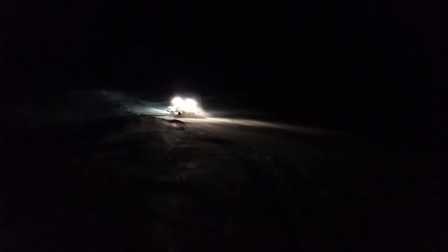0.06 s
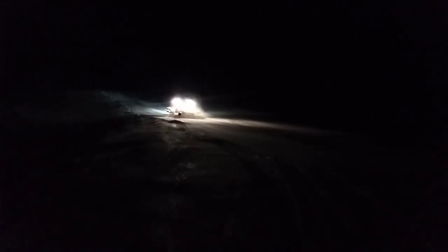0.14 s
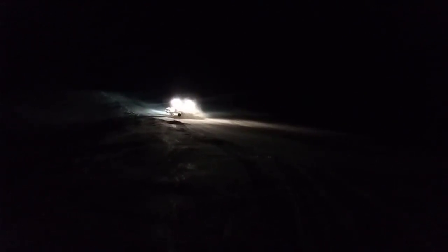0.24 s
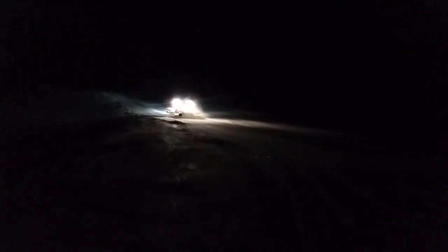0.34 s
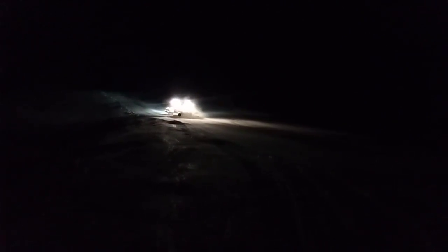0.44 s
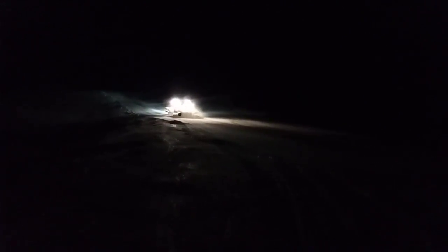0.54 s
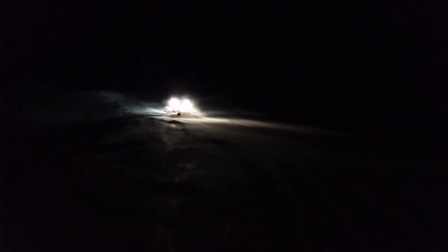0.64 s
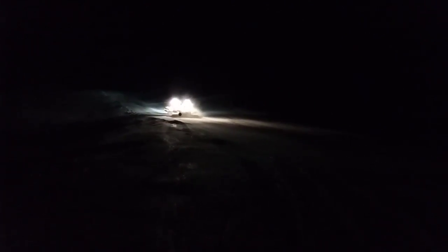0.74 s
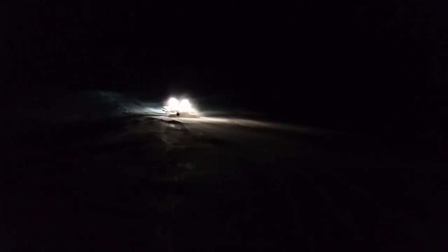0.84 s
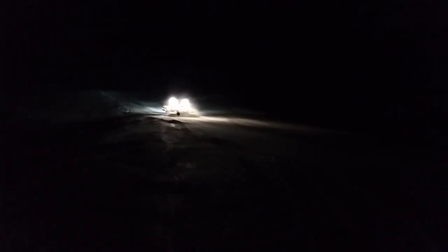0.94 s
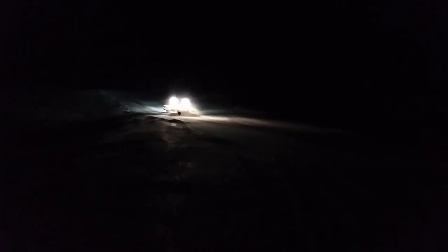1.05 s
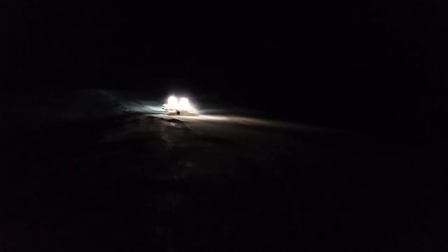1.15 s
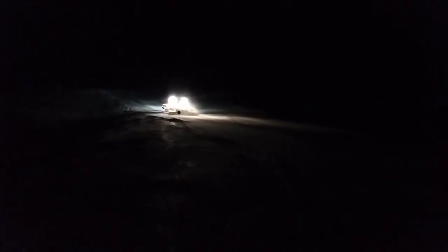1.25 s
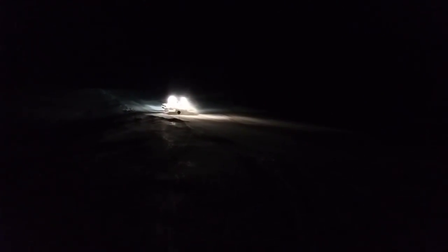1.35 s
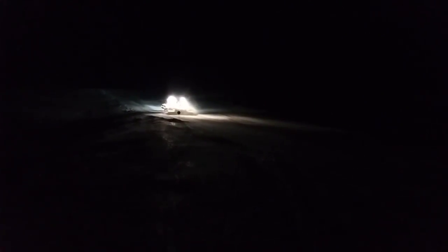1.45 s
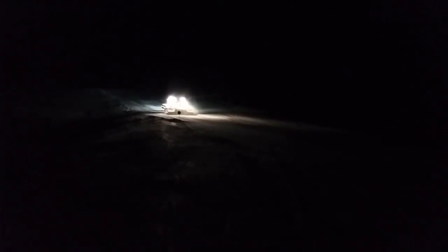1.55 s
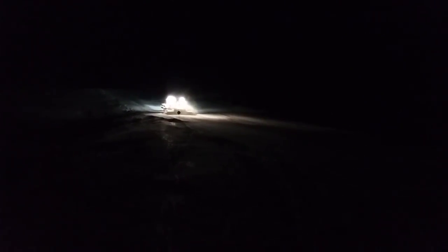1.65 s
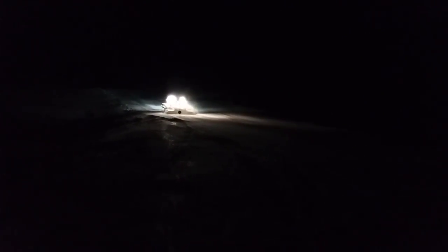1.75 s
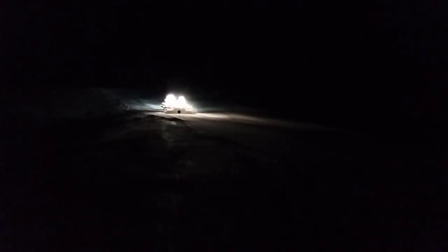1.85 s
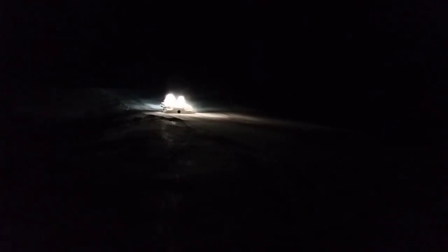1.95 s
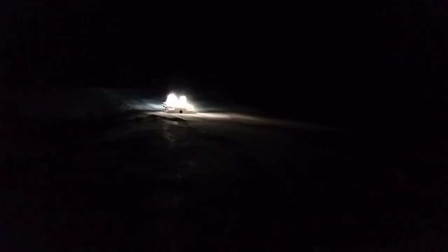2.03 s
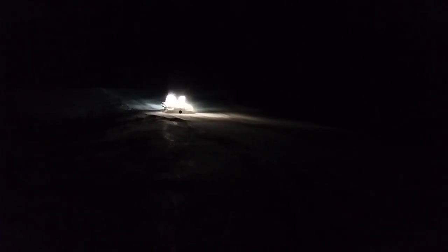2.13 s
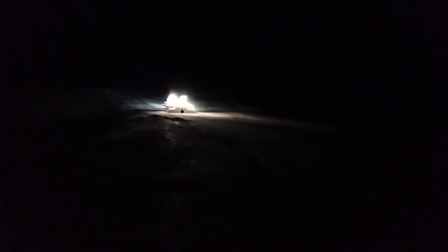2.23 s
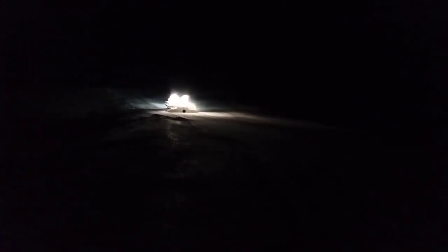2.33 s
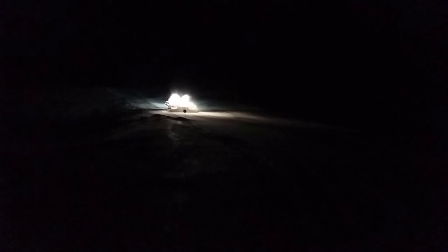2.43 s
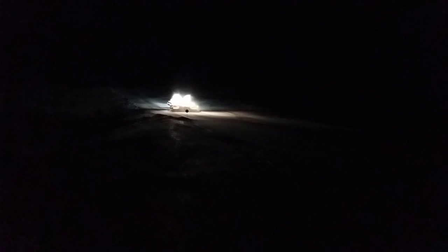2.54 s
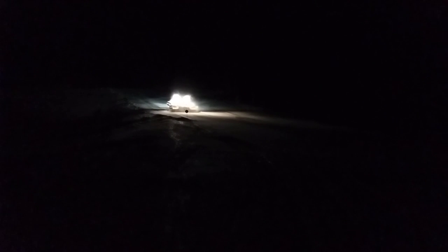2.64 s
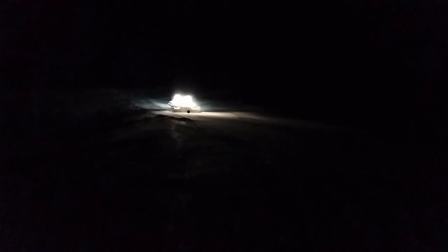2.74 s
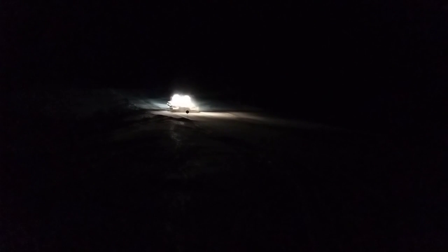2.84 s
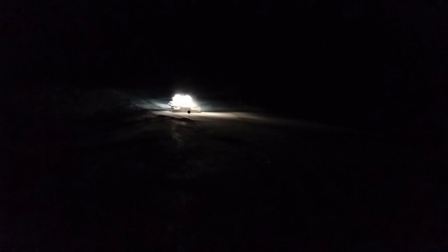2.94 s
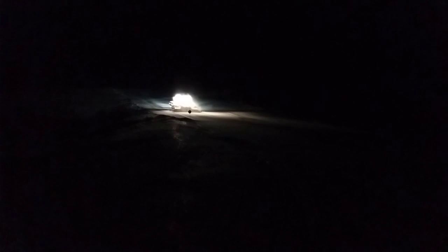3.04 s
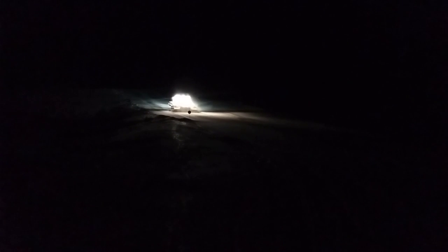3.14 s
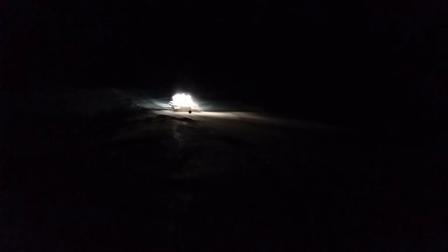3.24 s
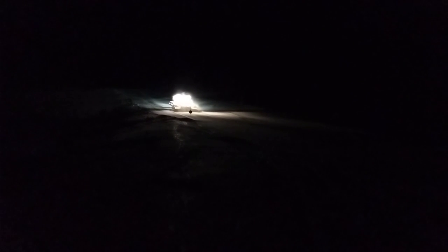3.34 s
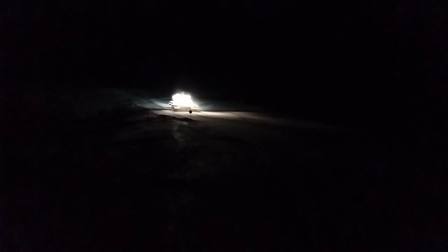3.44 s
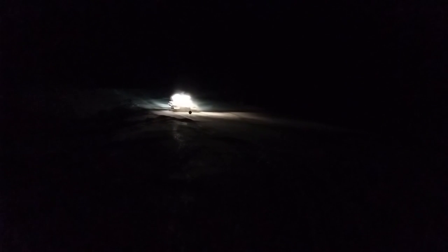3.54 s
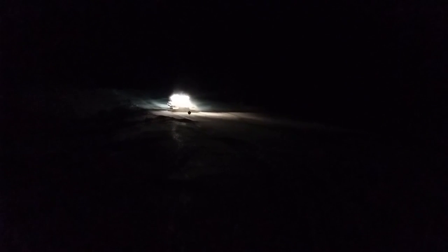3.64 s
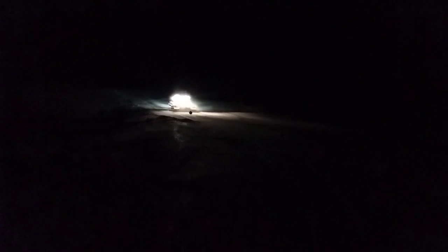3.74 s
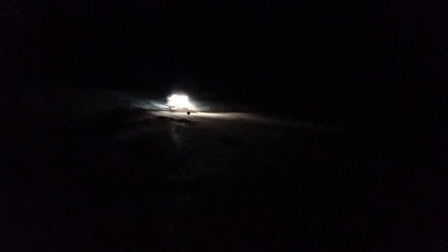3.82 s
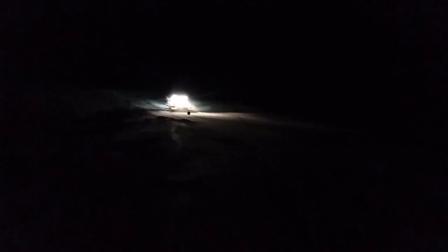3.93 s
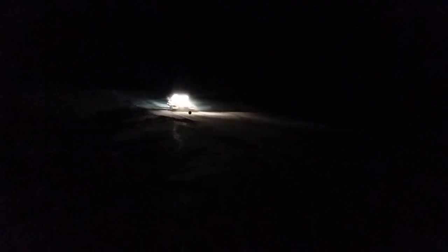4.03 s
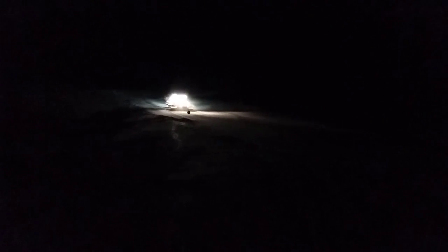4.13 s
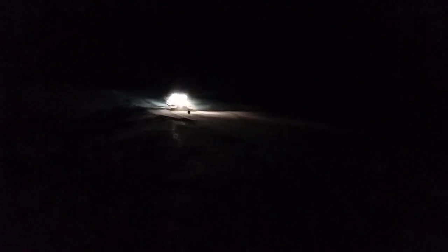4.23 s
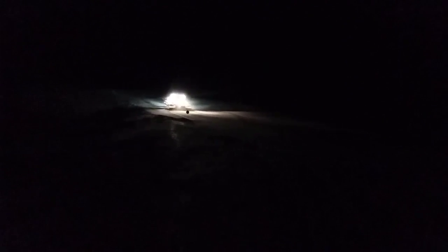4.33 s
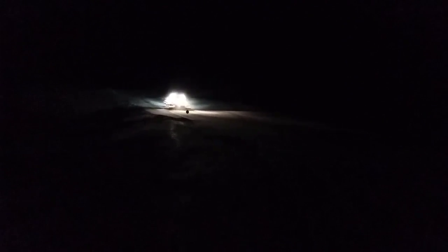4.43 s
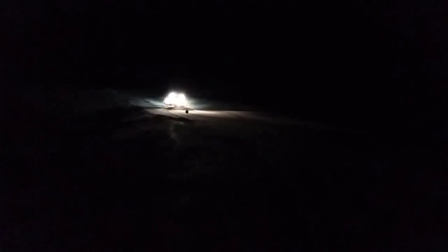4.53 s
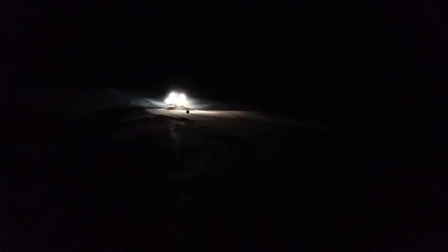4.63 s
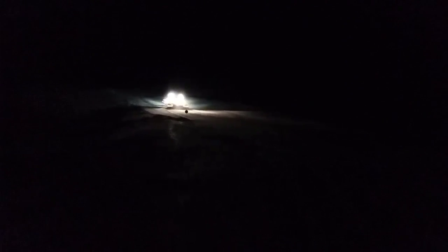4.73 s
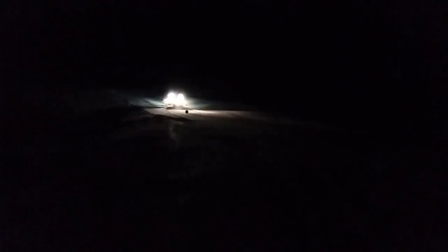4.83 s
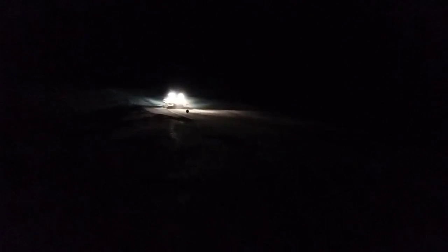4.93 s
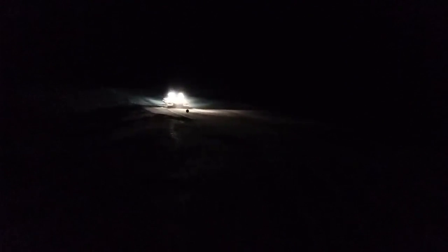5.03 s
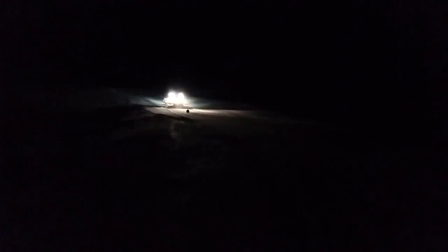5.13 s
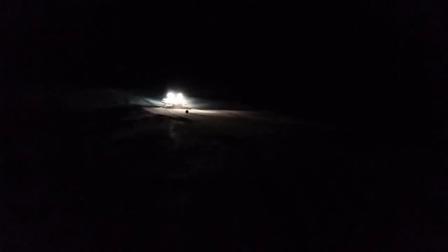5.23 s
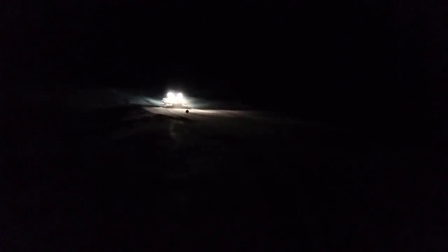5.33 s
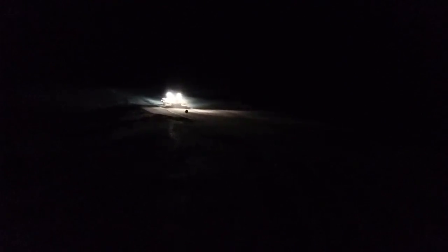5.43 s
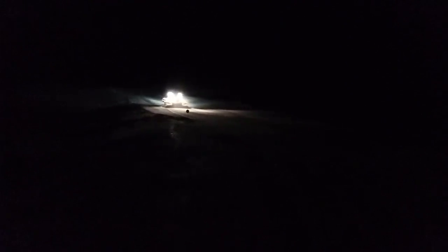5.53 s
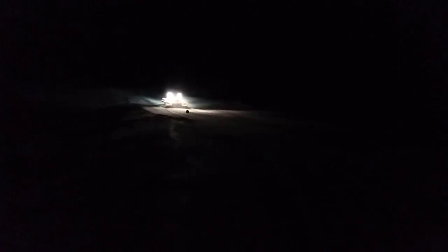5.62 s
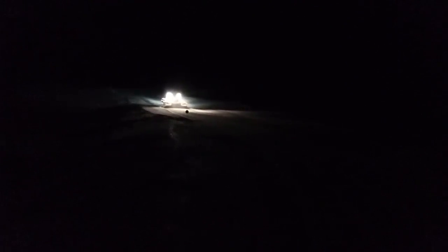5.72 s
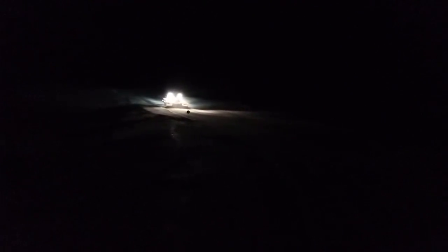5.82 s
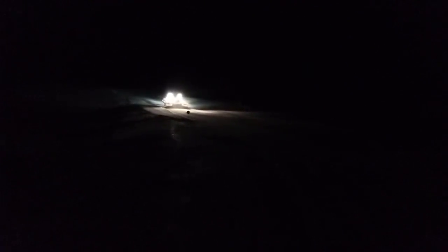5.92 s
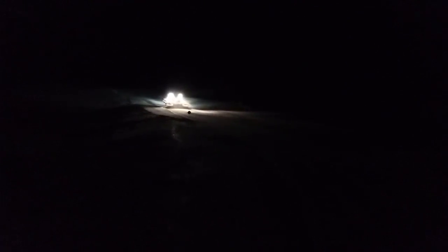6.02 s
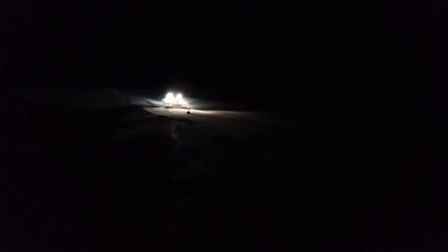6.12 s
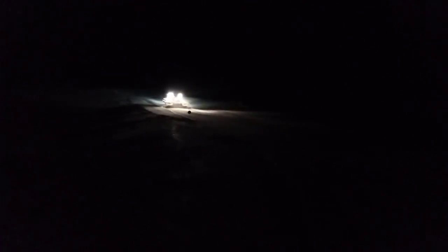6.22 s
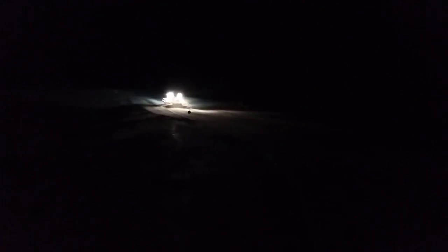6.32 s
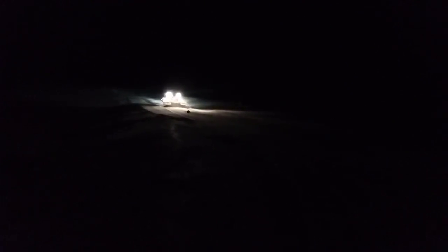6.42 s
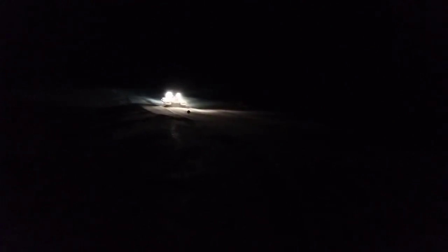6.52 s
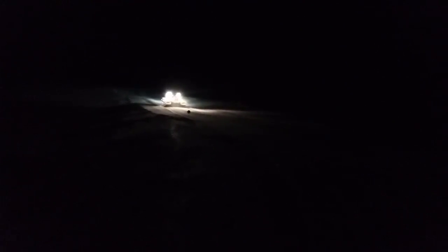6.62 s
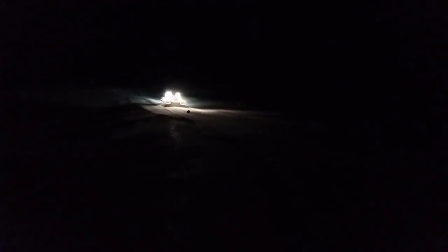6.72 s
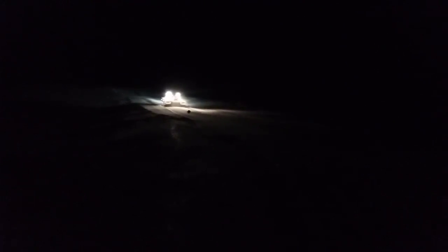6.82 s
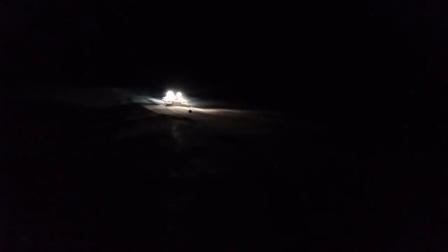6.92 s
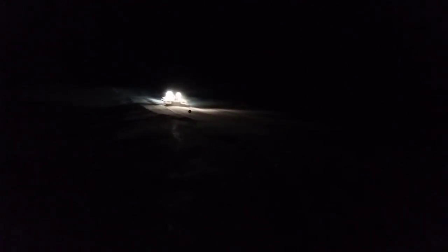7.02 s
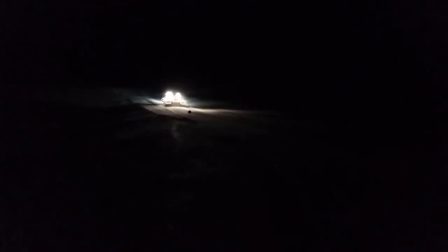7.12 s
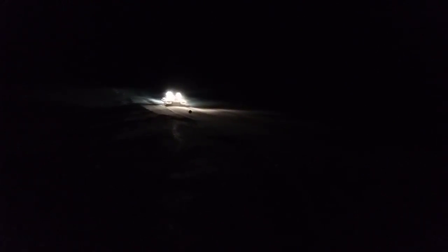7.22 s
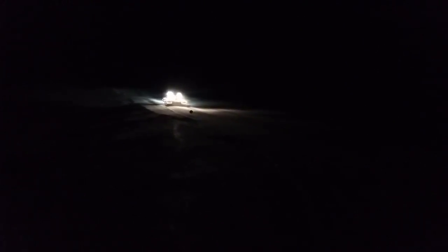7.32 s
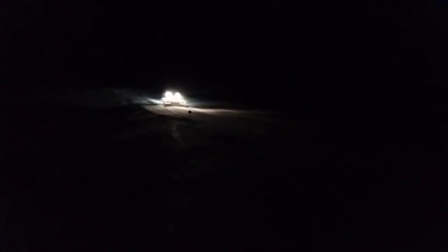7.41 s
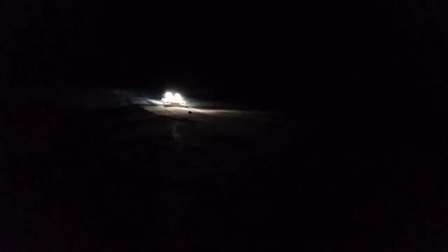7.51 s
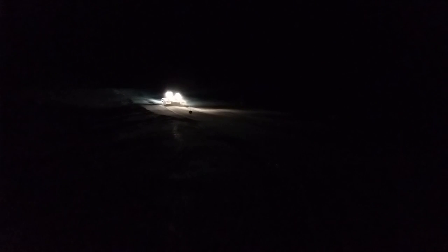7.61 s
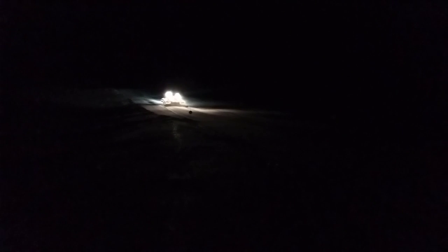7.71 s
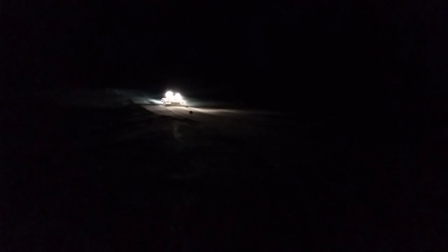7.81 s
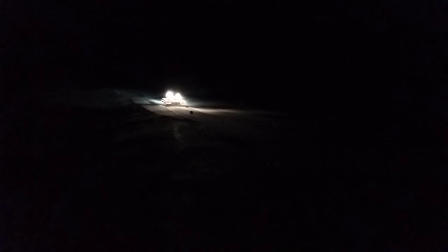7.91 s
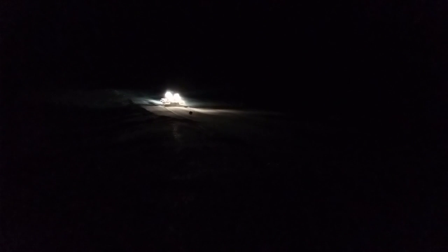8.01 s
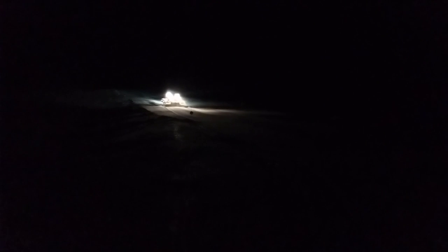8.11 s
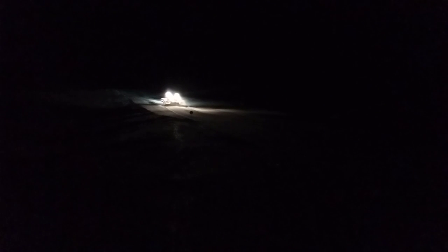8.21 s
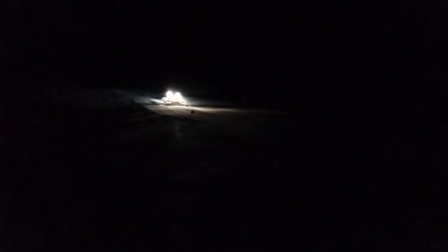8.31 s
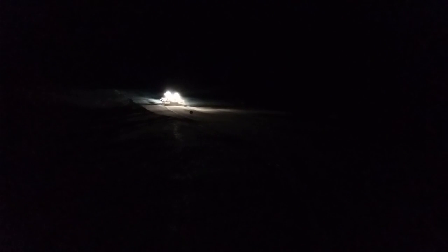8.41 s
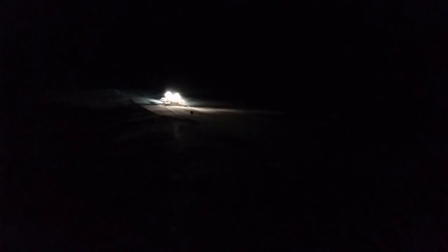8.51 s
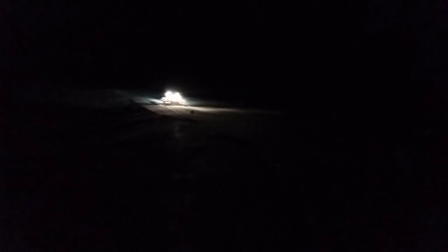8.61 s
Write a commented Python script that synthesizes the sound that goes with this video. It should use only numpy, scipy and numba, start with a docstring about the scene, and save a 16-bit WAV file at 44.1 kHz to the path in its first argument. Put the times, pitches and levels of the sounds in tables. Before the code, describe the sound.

A tracked machine's engine runs without a break, heard from a distance on an open snowy slope. Fast firing pulses roughen the drone, metal tracks chatter, and fine hiss sits on top. A very faint, high, breathy whistle flutters from about two to five seconds. Everything gradually recedes and softens, with wavering air and sliding, hollow coloration from the snow; the two channels differ in the treble.

```python
"""A snow groomer's six-cylinder diesel works under load as it climbs away up a slope, slowing on the steepest stretch.
From the start, exhaust harmonics drone, pulsed noise rings the engine block and rasps, track cleats clatter and
snow hisses; hard knocks crowd the first seconds and steel clinks are sparse. From about 2 s a faint, high
narrow-band whistle, made of filtered noise, comes and goes for some three seconds. Throughout, the sound fades with
distance, moving air swells and thins its upper part, and reflection off the snow cuts bands that slide, mostly down."""
import sys
import numpy as np
from scipy import signal
from scipy.fft import rfft, irfft
from scipy.io import wavfile
from scipy.ndimage import uniform_filter1d, map_coordinates
from numba import njit

SR = 44100
rng = np.random.default_rng(int(sys.argv[2]) if len(sys.argv) > 2 else 0)


def wrap_up_sound(samples):
    """Save the sound to the file named by the first command line argument, as 16-bit audio."""
    columns = np.atleast_2d(samples).T
    # keep every value between -1 and 1, then stretch to whole-number steps
    tamed = np.clip(columns, -1, 1)
    steps = np.round(tamed * 32767).astype(np.int16)
    wavfile.write(sys.argv[1], SR, steps)


N = 381906
T = np.arange(N) / SR  # time, s
FFT_SIZE = 2 ** 19
CYLINDERS = 6

# engine speed, sagging on the steepest stretch: time_s, firing_rate_hz
ENGINE_SPEED = [(0, 80.3), (.17, 80.3), (.66, 81.85), (.95, 81.85), (1.35, 80.7), (1.6, 80.95),
                (1.9, 80.65), (2.3, 80.75), (3.0, 79.65), (3.5, 78.25), (3.75, 78.2), (4.1, 77.2),
                (4.8, 77.1), (5.25, 78.05), (5.75, 77.55), (6.05, 78.1), (6.8, 77.9), (7.15, 78.6),
                (8.1, 78.65), (8.66, 79.0)]
# exhaust harmonics: multiple_of_firing_rate, level_db, flutter_share, extra_power_of_distance
FIRING_HARMONICS = [(1, -3, 0.035, 0), (2, -7.2, 0.07, -.05), (3, -5, 0.08, .2), (4, -22.5, 0.4, 0),
                    (5, -20, 0.35, 0)]
# lines from unequal cylinders: multiple_of_engine_cycle_rate, level_db
CYCLE_HARMONICS = [(4, -29.5), (8, -24), (9, -20), (10, -14), (14, -18.5), (16, -24), (19, -16.5),
                   (20, -22.5), (21, -19.5), (22, -20.5), (29, -25), (32, -29)]
# strength of each cylinder's blow, in firing order: level_db
CYLINDER_STRENGTH = [1, -.7, .4, 0, 0, -.7]
# firings in the clatter against its steady noise: time_s, gain_db
CLATTER_BITE = [(0, 1), (.8, 1.5), (1.5, 0), (2.3, 3.5), (3.4, 1), (4.7, 2.5), (5.3, -2), (6.2, -1),
                (7.4, -4), (8.1, 2.5)]
# firings in the treble against its steady noise: time_s, rasp_ratio_db, hiss_ratio_db
FIRING_BITE = [(0, 4.5, -2), (.6, 4, -2.5), (.9, 7, 2), (1.15, 2, -3), (1.6, -1.5, -7), (2.0, .5, -1.5),
               (2.5, -1.5, -8), (3.0, -3, -6), (3.3, -1.5, 1.5), (3.7, -2, -7), (4.4, .5, -5),
               (5.1, -2.5, -8), (5.8, -4, -7), (7.0, 0, -5.5), (7.7, -3, -8), (8.2, 3.5, -1),
               (8.66, -3, -6)]
# harder combustion knocks, before ground and ports: start_s, peak_db
HARD_KNOCKS = [(0.010, -11.5), (0.047, -11), (0.119, -9.5), (0.133, -10.5), (0.248, -9.5), (1.71, -10),
               (1.734, -11.5), (1.888, -12), (1.997, -11.5), (2.055, -11.5), (2.169, -13), (2.194, -10.5),
               (2.218, -12), (2.317, -11.5), (2.666, -15), (3.295, -16), (3.727, -17), (3.882, -16),
               (4.274, -14.5), (4.324, -16), (4.423, -13.5), (4.438, -15), (4.58, -16), (4.659, -16),
               (4.892, -17.5), (8.079, -16), (8.345, -17.5)]
# bright clinks of steel in the tracks, before ground and ports: start_s, peak_db
TRACK_CLINKS = [(0.031, -13.5), (0.735, -14.5), (0.918, -15), (1.176, -18), (3.649, -24.5), (4.113, -23.5),
                (5.045, -22), (7.124, -22.5)]
# whistle swells: centre_s, half_length_s, pitch_hz, level_db
WHISTLE_SWELLS = [(2.33, .12, 11220, -58), (2.56, .09, 11170, -52.5), (2.78, .09, 11130, -54),
                  (2.96, .12, 11090, -52.5), (3.21, .1, 11090, -58), (3.48, .08, 11110, -57),
                  (3.67, .13, 11160, -53.5), (4.04, .13, 11190, -57.5), (4.5, .25, 11200, -58.5)]

# relative spectra of block ring, rasp, hiss, whistle rush and rumble, each: frequency_hz, level_db
BLOCK_SPECTRUM = [(330, -23), (420, -18.5), (480, -5), (545, -9.5), (630, -7.5), (675, -1.5), (708, -3),
                  (745, 0.7), (778, -3), (812, -3), (875, -6.5), (925, -4.5), (958, -2.2), (1030, -6.5),
                  (1120, -6.5), (1195, -5.5), (1295, -14), (1375, -9.5), (1520, -18.5), (1600, -17),
                  (1700, -25.5), (2300, -33)]
RASP_SPECTRUM = [(1000, -12.5), (1700, -1), (2000, -1.5), (2450, -1), (2850, 4), (3350, 1.5), (3700, -3.5),
                 (4100, -6.5), (4550, -4.5), (5200, -8.5), (5800, -10.5), (6800, -13.5), (7500, -20.5)]
HISS_SPECTRUM = [(5000, -85), (7300, -18), (7900, -2), (8500, 6.5), (9500, 2), (9730, 8), (9950, -0.5),
                 (10400, 5.5), (10600, 7), (11150, 4), (11500, 4), (11900, 8), (12250, 4), (12850, 3),
                 (13300, 0), (14200, 4.5), (15500, 4.5)]
RUSH_SPECTRUM = [(10430, -25), (10510, 1), (10660, -3), (10820, -7), (11000, -4), (11230, -3), (11350, -22)]
RUMBLE_SPECTRUM = [(20, -33), (40, -32), (60, -36), (90, -9), (120, -3), (190, -7.5), (270, 0), (350, -8),
                   (450, -3.5), (700, -12.5), (1500, -47.5)]

# level ratio of the two microphone ports: frequency_hz, left_minus_right_db
PORT_LEVEL = [(90, -0.1), (155, 3.4), (240, 1), (380, 1.5), (600, 1.1), (1250, -0.1), (1600, -5.2),
              (1950, -9.9), (2250, 2.2), (2550, 9.1), (2950, 3.0), (3350, -0.1), (4000, -12.9),
              (4400, -1.7), (4750, 5.4), (5300, 1.0), (5800, -9.2), (6400, -1.3)]
# phase by which the left port leads: frequency_hz, lead_rad
PORT_LEAD = [(75, .53), (140, .4), (300, .1), (1000, 0), (1500, -.2), (1850, .2), (2050, 2.4), (2350, 2.0),
             (2600, .4), (3450, 0), (3850, .3), (4100, -3.4), (4700, -4.1), (5050, -5.4), (5500, -5.8),
             (6100, -8.7), (6750, -9.4), (7000, -12.57)]
# moving air swells and thins the clatter: time_s, gain_db
CLATTER_AIR = [(0, 0), (.7, 0), (1.3, 0), (1.68, -0.3), (1.74, 1.5), (1.93, 3), (2.15, -0.3), (2.5, -3),
               (2.7, -2.1), (2.95, -2.8), (3.3, 0.5), (3.8, -2.4), (4.0, 0.1), (4.5, -0.5), (4.8, -2.2),
               (5.3, -0.5), (6.45, 1), (6.85, -1.3), (8.3, 0.9), (8.66, 0.5)]
# and, independently, the treble: time_s, gain_db
TREBLE_AIR = [(0, 6), (.6, 4), (.86, 3.5), (1.04, -0.5), (1.17, 6), (1.45, -1), (2.35, -0.5), (3.4, 0),
              (3.8, -1), (4.3, 1.5), (4.85, 0.6), (5.4, 3), (6.6, -1.5), (7.2, -2), (7.6, -1), (8.25, -0.5),
              (8.66, -2)]
# short gusts raise or lower the treble: centre_s, half_length_s, rasp_gain_db, rasp_top_gain_db, hiss_gain_db
AIR_GUSTS = [(0.4, 0.082, -0.5, 4, 1.5), (0.818, 0.12, 2.5, 3, 3.5), (1.59, .08, 0, 3.5, -2),
             (1.97, 0.3, -1.2, 4.5, 0.5), (2.0, .04, 1, 1.5, 5.5), (2.307, 0.072, -0.5, -3, 0),
             (2.7, 0.42, 0, -1.5, -3), (3.124, 0.069, -3.5, 3.5, -1), (4.2, 0.17, 0, 2, 1),
             (4.61, 0.061, 1.5, 0.5, 6), (5.7, .1, 0.5, 0, -0.5), (6.244, 0.067, 2, -0.5, 3),
             (6.547, .14, 0, -1.5, -2.5), (7.16, 0.1, 2, 3, 0), (7.353, 0.055, 1.5, 4, 1),
             (7.682, 0.069, -0.5, 5.5, -2), (8.2, 0.1, 1.5, -1, 3.5)]
# bounce off the snow: time_s, lowest_cancelled_hz, bounce_strength
SNOW_BOUNCE = [(0, 1770, 0.58), (1.1, 1870, 0.77), (1.8, 1910, 0.86), (3.2, 1670, 0.59), (4.2, 1690, 0.88),
               (5.2, 1390, 0.8), (5.9, 1190, 0.96), (6.4, 1370, 0.14), (7.1, 1160, 1), (7.65, 1230, 1.2),
               (8.0, 1440, .7), (8.4, 1330, 1.2)]
# its comb: multiple_of_lowest_cancelled, width_hz, gain_at_strength_1_db
BOUNCE_COMB = [(1, 272, -7), (1.67, 520, -5), (2.6, 480, -2)]
# one further band the bounce lifts or lowers: time_s, centre_hz, gain_db
BOUNCE_LIFT = [(0, 2360, 6.5), (.9, 2650, 1), (1.4, 2420, 0), (1.95, 2200, 11), (2.5, 2390, -2),
               (4.5, 2110, 2), (5.7, 1570, -3.5), (7.0, 1700, 4.5), (8.66, 1600, 4)]
# panel resonances that swell or sink: centre_s, half_length_s, centre_hz, width_hz, gain_db
PANEL_RESONANCES = [(.1, .25, 690, 29, 1.5), (0.45, 0.21, 970, 11, 7), (.68, 0.054, 1350, 280, 6),
                    (.55, 0.42, 2840, 170, 5), (1.252, 0.14, 945, 160, -7), (2.15, 0.27, 950, 11, 7.5),
                    (2.75, .2, 727, 28, 10), (4.307, 0.072, 770, 25, 5), (5.3, 0.6, 950, 170, 4.5),
                    (6.0, 0.89, 734, 250, -1), (6.4, 0.43, 490, 73, 4.5), (7.0, 0.35, 2770, 280, 6.5),
                    (8.25, 0.46, 650, 21, 3.5), (8.284, 0.14, 748, 45, 6), (8.4, 0.29, 970, 110, -10)]
# bands the uneven slope cancels or reinforces: centre_s, half_length_s, centre_hz, width_hz, gain_db
SLOPE_FADES = [(0.136, 0.093, 3550, 700, 1), (.88, 0.11, 3000, 800, 4), (3.17, 0.12, 3750, 600, 5.5),
               (3.15, 0.16, 1900, 600, 4), (3.473, .045, 3300, 800, 6), (4.67, .07, 5000, 1300, 4),
               (5.652, 0.39, 1410, 200, 7), (5.7, 0.43, 2170, 250, -3), (7.0, 0.6, 2400, 250, -3.5),
               (7.55, .3, 3900, 250, 4.5), (7.5, 0.47, 520, 200, 3.5), (8.3, 0.23, 2220, 300, 7)]

RECEDE_PER_S = 0.24  # share of the starting distance added each second
# base level of each layer (dB) and the power of distance by which it fades
EXHAUST_DB, EXHAUST_FADE = -32.6, 0.42
CLATTER_DB, CLATTER_FADE = -20, 1.04
RASP_DB, RASP_FADE, UPPER_RASP_FADE = -34, 0.43, 0.81
HISS_DB, HISS_FADE = -47, 1.21
RUMBLE_DB, RUMBLE_FADE = -37.5, 0.19
EXHAUST_DB_PER_HZ = 0.05  # gain per Hz of firing rate above its mean
PUMP_MULTIPLE, PUMP_DB = 4.255, -18.5  # hydraulic pump: multiple of firing rate, dB within the exhaust
KNOCK_CHATTER_S, CLINK_CHATTER_S = .0016, .002  # decay of contact chatter, s
WHISTLE_WIDTH_HZ, RUSH_DB = 150, -3  # width of each of two filters; rush relative to tone
LIFT_WIDTH_HZ = 215
LOW_RING_SHARE, HIGH_RING_SHARE, HISS_SHARE = .45, .7, .62  # share of the variation each part follows
FLICKER_DB, FLICKER_PER_S = .7, 14  # upper bands: rms spread, new random levels per second
TOP_HZ = 15850


def undb(db):
    """Logarithmic level: decibels become an amplitude ratio."""
    return 10 ** (np.asarray(db) / 20)


def unit(x):
    """Normalisation: mean power becomes 1."""
    return x / np.sqrt(np.mean(x ** 2))


def curves(rows):
    """Linear interpolation: each column of a time table at every sample."""
    time_s, *columns = np.transpose(rows)
    return [np.interp(T, time_s, column) for column in columns]


def over_frequency(points):
    """Interpolation on a logarithmic frequency axis, at the bins of a transform."""
    hz, value = np.transpose(points)
    bins_hz = np.arange(FFT_SIZE // 2 + 1) * SR / FFT_SIZE
    return np.interp(np.log(bins_hz + 1), np.log(hz), value)


def colour(x, points):
    """Minimum-phase filtering: the folded cepstrum of a spectrum gives a causal ring."""
    below = (points[0][0] / 2, points[0][1] - 30)
    above = (points[-1][0] * 1.5, points[-1][1] - 30)
    cepstrum = irfft(np.log(undb(over_frequency([below, *points, above]))))
    cepstrum[1:FFT_SIZE // 2] *= 2
    cepstrum[FFT_SIZE // 2 + 1:] = 0
    response = np.exp(rfft(cepstrum))
    return unit(irfft(rfft(x, FFT_SIZE) * response)[:N])


@njit
def band(x, hz, width):
    """Resonance: a state-variable band-pass with a moving centre, gain 1 there."""
    y, b, low = np.empty(len(x)), 0., 0.
    for i in range(len(x)):
        g, k = np.tan(np.pi * hz[i] / SR), width / hz[i]
        v = (b + g * (x[i] - low)) / (1 + g * (g + k))
        b, low, y[i] = 2 * v - b, low + 2 * g * v, k * v
    return y


def shelf(x, edge_hz, db):
    """Band splitting: the part above the edge swells and fades about its mean level in dB."""
    low = signal.sosfiltfilt(signal.butter(4, edge_hz, fs=SR, output="sos"), x)
    return low + (x - low) * undb(db - np.mean(db))


def bell(centre_s, half_s):
    """Gaussian envelope: a swell of height 1, down to 1/e at the half length."""
    return np.exp(-((T - centre_s) / half_s) ** 2)


def walk(rate):
    """Slow random modulation: levels drawn at this rate, smoothed twice, with rms 1."""
    hold = int(SR / rate)
    held = np.repeat(rng.standard_normal(N // hold + 1), hold)
    smooth = uniform_filter1d(uniform_filter1d(held, hold), hold)
    return unit(smooth[:N])


def clicks(rate, spread_db):
    """Random impulse train: impacts of uneven size and either sign at a mean rate per second."""
    struck = rng.random(N) < rate / SR
    sign = rng.choice([-1, 1], N)
    return unit(struck * sign * undb(spread_db * rng.standard_normal(N)))


def firings(phase, rise, decay, scatter_db):
    """Periodic noise bursts: each firing rises and dies within a share of its period, at scattered strength."""
    index = phase.astype(int)
    age = (phase - index) / decay
    scatter = scatter_db * rng.standard_normal(1024)[index % 1024]
    size = undb(np.take(CYLINDER_STRENGTH, index % CYLINDERS) + scatter)
    return unit(size * age ** rise * np.exp(-age) * rng.standard_normal(N))


def line(phase, flutter, rate):
    """Multipath fading: a tone whose size and phase flutter as its paths over the snow shift."""
    fading = 1 + flutter * (walk(rate) + 1j * walk(rate))
    tone = fading * np.exp(2j * np.pi * (phase + rng.random()))
    return unit(tone.real)


def blend(blows, steady, bite_db):
    """Power-preserving mixture of pulsing and steady sound."""
    gain = undb(bite_db)
    return (gain * blows + unit(steady)) / np.hypot(gain, 1)


def swells(x, rows):
    """Time-varying resonance: single bands rise or sink for a moment."""
    for centre_s, half_s, hz, width, db in rows:
        gain = undb(db * bell(centre_s, half_s))
        x = x + (gain - 1) * band(x, np.full(N, float(hz)), float(width))
    return x


def strikes(rows, body, chatter_s, size=4096):
    """Impact excitation: a moment of random contact chatter makes each blow ring the body a little differently."""
    ring = colour(signal.unit_impulse(N), body)[:size]
    out = np.zeros(N + size)
    for start_s, peak_db in rows:
        contact = rng.standard_normal(size) * np.exp(-T[:size] / chatter_s)
        hit = signal.fftconvolve(contact, ring)[:size]
        start = int(start_s * SR)
        out[start:start + size] += undb(peak_db) * hit / np.abs(hit).max()
    return out[:N]


def distance_db():
    """Spherical spreading: the level falls with distance as the machine recedes at a steady pace."""
    return -20 * np.log10(1 + RECEDE_PER_S * T)


def flicker_db():
    """Scintillation: quick random shimmer of sound that has crossed moving air."""
    return FLICKER_DB * walk(FLICKER_PER_S)


def gusts_db(column):
    """Superposition of the gusts: the gain they give in one column of their table."""
    return sum(row[column] * bell(row[0], row[1]) for row in AIR_GUSTS)


def rasp_db():
    """Propagation loss: level at which the rasp arrives through distance and moving air."""
    return RASP_DB + RASP_FADE * distance_db() + curves(TREBLE_AIR)[0] + gusts_db(2)


def exhaust(phase):
    """Harmonic synthesis: firing harmonics, lines at multiples of the engine cycle, and a geared pump's hum."""
    drone = sum(undb(db + fade * distance_db()) * line(round(k) * phase, flutter, rate=6)
                for k, db, flutter, fade in FIRING_HARMONICS)
    lope = sum(undb(db) * line(round(k) * phase / CYLINDERS, flutter=0.36, rate=5)
               for k, db in CYCLE_HARMONICS)
    pump = undb(PUMP_DB) * line(PUMP_MULTIPLE * phase, flutter=.4, rate=5)
    firing_hz = curves(ENGINE_SPEED)[0]
    speed_db = EXHAUST_DB_PER_HZ * (firing_hz - np.mean(firing_hz))  # louder when faster
    return (drone + lope + pump) * undb(EXHAUST_DB + speed_db + EXHAUST_FADE * distance_db())


def clatter(phase):
    """Forced resonance: combustion and cleats ring block and frame; the lowest ring fades least with distance."""
    air_db = curves(CLATTER_AIR)[0]
    carry_db = CLATTER_FADE * distance_db() + air_db
    cleats = undb(-6) * clicks(rate=900, spread_db=1.5)
    blows = undb(curves(CLATTER_BITE)[0]) * firings(phase + .17, rise=1, decay=.18, scatter_db=.7)
    drive = blows + cleats + 1.62 * rng.standard_normal(N)
    # variation withheld from the low ring
    swing_db = (1 - LOW_RING_SHARE) * (carry_db - np.mean(carry_db))
    ring = shelf(colour(drive, BLOCK_SPECTRUM), 560, swing_db)
    ring = shelf(ring, 1460, (HIGH_RING_SHARE - 1) * air_db + flicker_db())
    return ring * undb(CLATTER_DB + carry_db - swing_db)


def paths(x, echo_db, count=6):
    """Multipath interference: detours over the slope, about 1 to 9 ms longer and drifting, ripple the spectrum."""
    out = x
    for _ in range(count):
        delay_s = rng.uniform(.001, .009) + .00012 * walk(rate=.9)
        echo = map_coordinates(x, [(T - delay_s) * SR], order=3)
        out = out + rng.choice([-1, 1]) * undb(echo_db) * echo
    return unit(out)


def rasp(phase):
    """Pulsed broadband noise: the edge of each firing with fine track ticking; its top fades faster."""
    ticks = undb(-8) * clicks(rate=700, spread_db=2)
    blows = firings(phase + .33, rise=1, decay=.21, scatter_db=1.1)
    drive = blend(blows, ticks + rng.standard_normal(N), curves(FIRING_BITE)[0])
    carried = paths(colour(drive, RASP_SPECTRUM), echo_db=-19.5)
    upper_db = (UPPER_RASP_FADE - RASP_FADE) * distance_db() + gusts_db(3) + flicker_db()
    return shelf(carried, 3400, upper_db) * undb(rasp_db())


def scatter():
    """Diffuse reflection: rasp thrown back by the slope from all sides, independent at each port."""
    wash = np.array([colour(rng.standard_normal(N), RASP_SPECTRUM) for _ in range(2)])
    return wash * undb(rasp_db() - 15.5)


def rumble():
    """Low-frequency rolling noise: tracks and tiller on the snow, partly different at each port."""
    mid, side = (colour(rng.standard_normal(N), RUMBLE_SPECTRUM) for _ in range(2))
    level_db = RUMBLE_DB + RUMBLE_FADE * distance_db() + .5 * walk(13.0)
    return (mid + undb(-12.0) * np.outer([1, -1], side)) * undb(level_db)


def air_on_ports():
    """Flow noise: a little low-frequency air movement, independent in waveform at each port."""
    spectrum = [(20, -4), (45, 3), (90, -19)]  # Hz, dB
    air = np.array([colour(rng.standard_normal(N), spectrum) for _ in range(2)])
    return undb(-70.0 + 2 * walk(5)) * air


def hiss(phase):
    """Turbulent and granular noise: churned snow and pulsing exhaust gas, partly different at each port."""
    puffs = firings(phase + .38, rise=2, decay=.15, scatter_db=2.5)
    drive = blend(puffs, rng.standard_normal(N), curves(FIRING_BITE)[1])
    side = undb(-8.5) * colour(rng.standard_normal(N), HISS_SPECTRUM)
    mid = shelf(colour(drive, HISS_SPECTRUM), 10000, .7 * walk(14))
    air_db = HISS_SHARE * curves(TREBLE_AIR)[0] + gusts_db(4) + flicker_db()
    carry_db = HISS_FADE * distance_db() + air_db
    return (mid + np.outer([1, -1], side)) * undb(HISS_DB + carry_db)


def knocks():
    """Impulse response of the block: hard combustion knocks set it ringing."""
    return strikes(HARD_KNOCKS, BLOCK_SPECTRUM, KNOCK_CHATTER_S)


def clinks():
    """Impulse response of track steel: sparse impacts ring with the bright rasp spectrum."""
    return strikes(TRACK_CLINKS, RASP_SPECTRUM, CLINK_CHATTER_S)


def whistle():
    """Narrow-band noise: a whistle drifts in pitch over a breathy rush, coming and going in short swells."""
    pitch_hz, width = curves(WHISTLE_SWELLS)[1], float(WHISTLE_WIDTH_HZ)
    once = band(rng.standard_normal(N), pitch_hz, width)
    tone = unit(band(once, pitch_hz, width))
    rush = undb(RUSH_DB) * colour(rng.standard_normal(N), RUSH_SPECTRUM)
    swell = sum(undb(db) * bell(centre_s, half_s) for centre_s, half_s, _, db in WHISTLE_SWELLS)
    return unit(tone + rush) * swell


def ground(x):
    """Interference with the snow bounce: three bands are cut and one lifted or lowered as the path changes."""
    cancelled_hz, strength = curves(SNOW_BOUNCE)
    for multiple, width, db in BOUNCE_COMB:
        x = x + (undb(db * strength) - 1) * band(x, multiple * cancelled_hz, float(width))
    lift_hz, lift_db = curves(BOUNCE_LIFT)
    return x + (undb(lift_db) - 1) * band(x, lift_hz, float(LIFT_WIDTH_HZ))


def ports(x):
    """Path difference: sound reaches two ports by different routes, giving each its own levels and phase."""
    ratio = undb(over_frequency(PORT_LEVEL))
    lead = over_frequency(PORT_LEAD)
    right = rfft(x, FFT_SIZE) * np.sqrt(2 / (1 + ratio ** 2))  # keeps the two ports' total power
    return irfft([right * ratio * np.exp(.5j * lead), right * np.exp(-.5j * lead)])[:, :N]


def scene():
    """Superposition: one firing phase times all the combustion layers, and the rest adds to them."""
    phase = np.cumsum(curves(ENGINE_SPEED)[0]) / SR  # in firings
    roar = swells(clatter(phase) + rasp(phase), PANEL_RESONANCES)
    blows = knocks() + clinks()
    over_snow = swells(ground(roar + blows), SLOPE_FADES)
    machine = exhaust(phase) + over_snow + whistle()
    return ports(machine) + scatter() + rumble() + air_on_ports() + hiss(phase)


def record(dry):
    """Band limitation: a steep elliptic low-pass cuts the top."""
    return signal.sosfilt(signal.ellip(14, .2, 80, TOP_HZ, fs=SR, output="sos"), dry)


dry = scene()
out = record(dry)
wrap_up_sound(out)
```